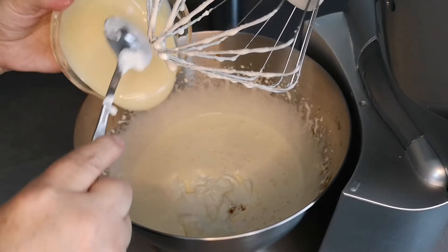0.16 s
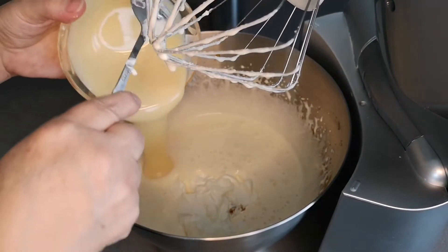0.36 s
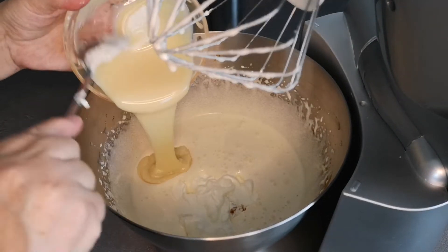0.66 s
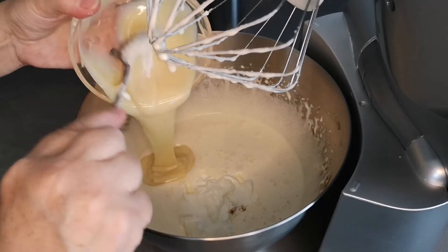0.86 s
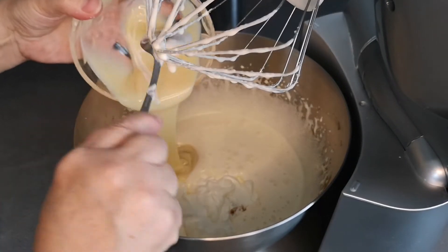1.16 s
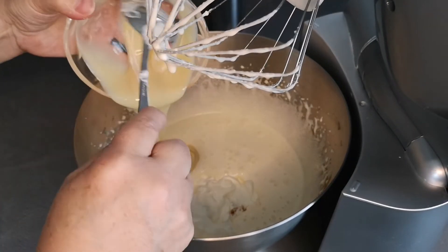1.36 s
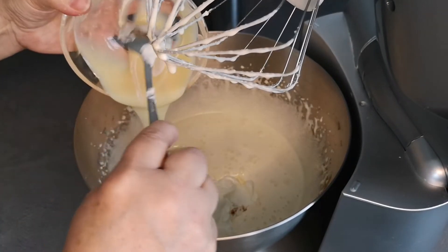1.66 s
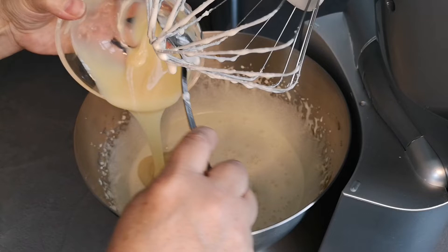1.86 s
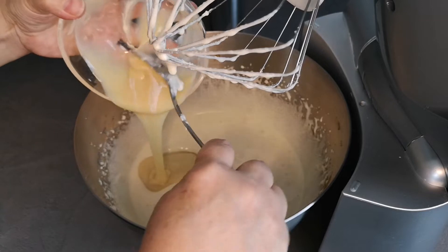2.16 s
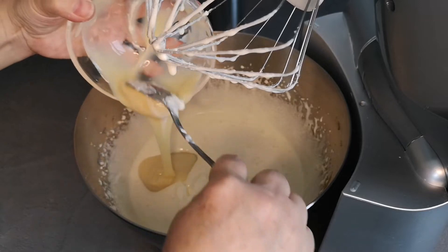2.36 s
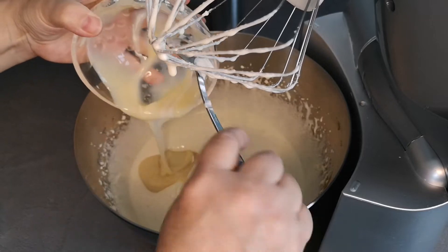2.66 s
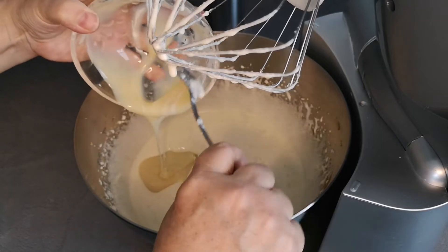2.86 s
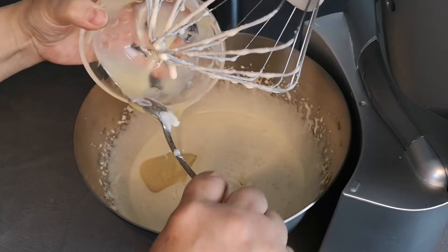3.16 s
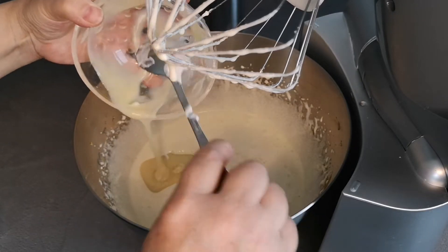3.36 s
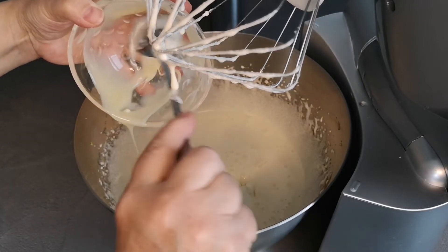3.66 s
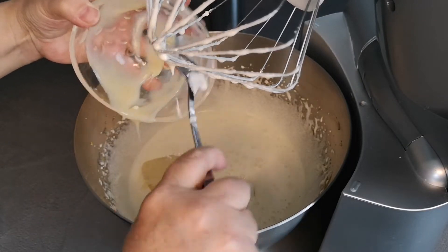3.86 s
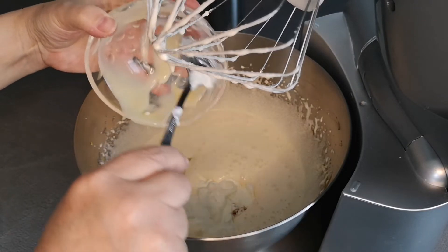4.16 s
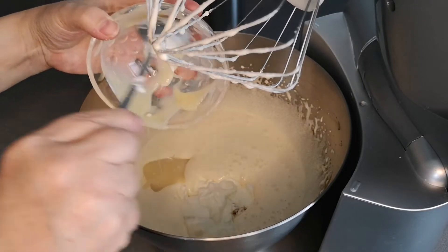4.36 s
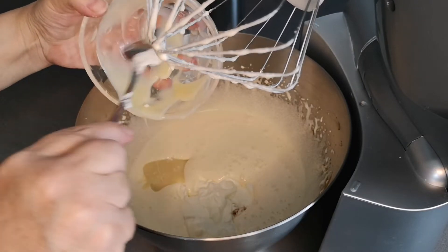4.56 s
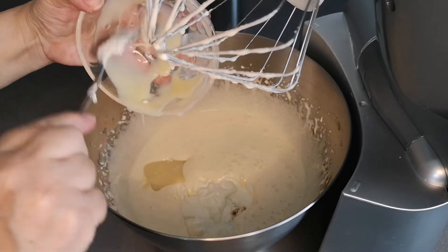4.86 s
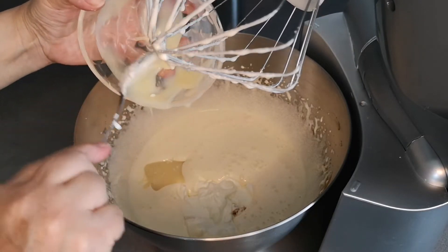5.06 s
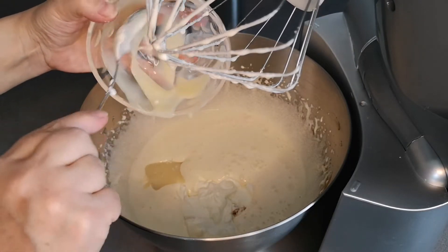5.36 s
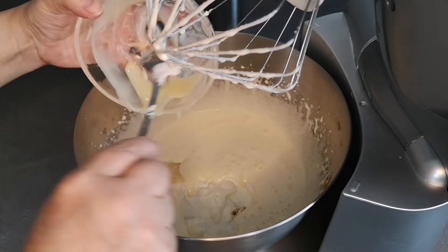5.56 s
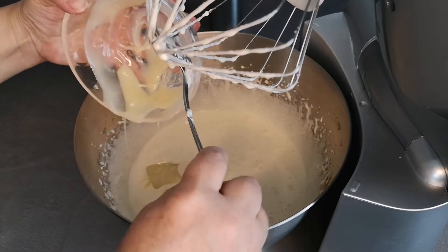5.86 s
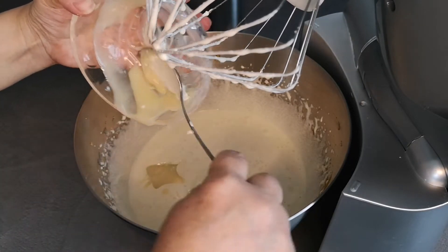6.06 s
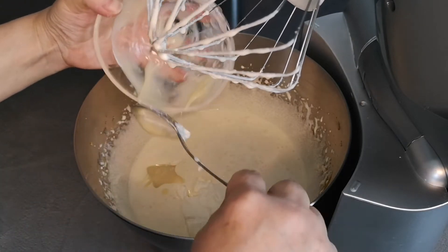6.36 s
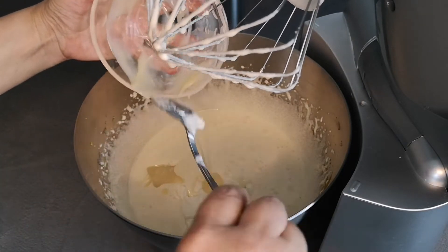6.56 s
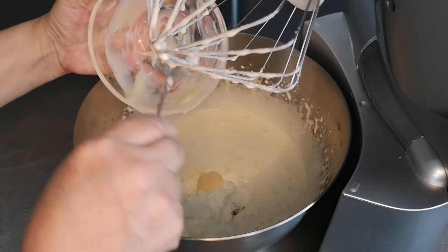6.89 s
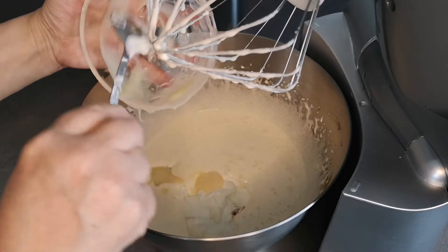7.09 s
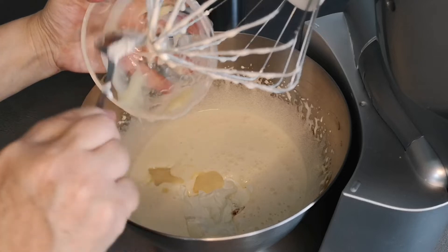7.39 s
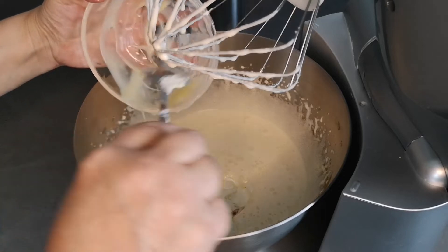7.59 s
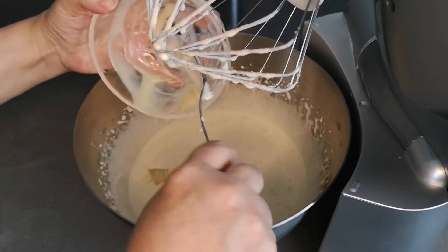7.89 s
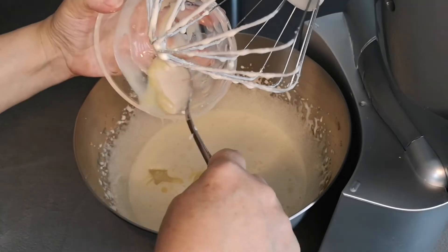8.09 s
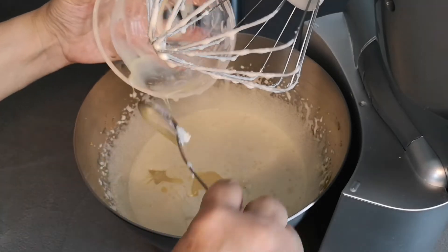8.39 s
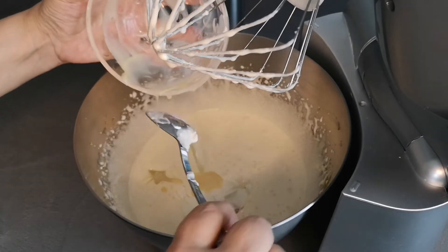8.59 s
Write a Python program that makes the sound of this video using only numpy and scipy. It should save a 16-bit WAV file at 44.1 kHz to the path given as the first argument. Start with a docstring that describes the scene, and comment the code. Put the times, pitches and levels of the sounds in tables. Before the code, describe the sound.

A metal fork clinks and scrapes inside a small hand-held glass bowl, scooping thick sweet mixture, over a faint low appliance hum in a ringing kitchen.

```python
"""A faint appliance hum and low rumble in a hard, ringing kitchen, then a fork clinks on glass.
The fork scoops a thick sweet mixture out of a small hand-held glass bowl. Each stroke is a burst of damped
modes, deadened by hand and syrup, then a drag: the clink convolved with tiny friction slips. Between them,
sweeps through the syrup are shaped friction noise. Twice the fork slips off the rim with a hollow chatter
of unsteady sines. Random echoes make the room; the microphone is hollow in its low midrange."""
import sys
import numpy as np
from scipy import signal
from scipy.fft import rfft, irfft, next_fast_len
from scipy.io import wavfile
from scipy.ndimage import map_coordinates

SR = 44100
rng = np.random.default_rng(int(sys.argv[2]) if len(sys.argv) > 2 else 0)


def file_out(sig):
    """Save sig as 16-bit WAV at sys.argv[1]."""
    # one column per channel
    cols = np.atleast_2d(sig).T
    # limit, then scale
    lim = np.clip(cols, -1, 1)
    pcm = np.round(lim * 32767).astype(np.int16)
    wavfile.write(sys.argv[1], SR, pcm)


N = 385196


def amp(db):
    """Decibels to gain."""
    return 10 ** (np.asarray(db) / 20)


def unit(x):
    """Scale to rms 1."""
    return x / np.sqrt(np.mean(x ** 2) + 1e-20)


def blow(x):
    """Scale a short sound to the energy of 12 ms at rms 1 in each channel."""
    return x / np.sqrt(np.sum(x ** 2, axis=-1, keepdims=True) / (.012 * SR) + 1e-20)


def tilt(left_minus_right_db):
    """Stereo gains, half the level difference on each side."""
    return amp([[left_minus_right_db / 2], [-left_minus_right_db / 2]])


def along(points, hz):
    """(Hz, value) points read on a log frequency axis."""
    f, v = np.transpose(points)
    return np.interp(np.log(hz + 1), np.log(f + 1), v)


def wobble(rate, size=N):
    """A smooth random curve, rate knots a second."""
    knots = rng.standard_normal(int(size * rate / SR) + 4)
    return map_coordinates(knots, [np.arange(size) * rate / SR])


def filtered(x, response):
    """x times a response of frequency, padded so that its tail does not wrap into the start."""
    n = x.shape[-1]
    m = next_fast_len(n + 4096)
    return irfft(rfft(x, m) * response(np.fft.rfftfreq(m, 1 / SR)), m)[..., :n]


def coloured(x, spectrum):
    """x shaped by (Hz, dB) points."""
    return filtered(x, lambda hz: amp(along(spectrum, hz)))


def add(track, s, sound):
    """Mix a stereo sound into the track at time s."""
    start = max(round(s * SR), 0)
    part = sound[:, :max(N - start, 0)]
    track[:, start:start + part.shape[1]] += part


# Still kitchen air. Each row: frequency in Hz, relative level in dB per Hz.
AIR_SPECTRUM = [(13, -40), (22, 1), (102, -12.5), (203, -20.5), (227, -19), (267, -21.5), (779, -30.5),
                (1870, -26.5), (4630, -35.5), (15500, -44.5)]
# How alike the air is in left and right. Each row: frequency in Hz, likeness from 0 to 1.
AIR_LIKENESS = [(60, 1), (140, .9), (400, 0.12), (1500, 0.1), (8000, 0.064)]
# Partials of the appliance hum, before the swell.
# Each row: frequency in Hz, level in dB at first, level in dB once the load has changed.
HUM_PARTIALS = [(59.6, -69, -70), (100.5, -70.5, -75), (83, -79, -76), (139.3, -83.5, -74),
                (193, -84, -84.5)]
# Hum and rumble rise once and ease off again, from a resting level.
LOW_REST_DB, SWELL_DB, SWELL_PEAK_S, SWELL_WIDTH_S = -0.8, 4.5, 6, 1.9


def background(air_db=-66, waver_db=3):
    """Noise as rumble and faint hiss, and wavering sines as an appliance whose load changes around 5 s."""
    # mid and side shares that give the wanted likeness between the channels
    angle = lambda hz: np.arccos(np.clip(along(AIR_LIKENESS, hz), -1, 1)) / 2
    mid_side = lambda hz: amp(along(AIR_SPECTRUM, hz)) * [np.cos(angle(hz)), np.sin(angle(hz))]
    mid, side = filtered(rng.standard_normal((2, N)), mid_side)
    air = unit(np.array([mid + side, mid - side]))
    rumble = filtered(air, lambda hz: 1 / (1 + (hz / 200) ** 4))
    hiss = air - rumble

    t = np.arange(N) / SR
    load = (1 + np.tanh((t - 5.0) / 0.94)) / 2
    hum = 0
    for hz, first_db, later_db in HUM_PARTIALS:
        level = amp(first_db + load * (later_db - first_db) + waver_db * wobble(9.8))
        hum = hum + level * np.sqrt(2) * np.sin(2 * np.pi * hz * t + 1.15 * wobble(11))

    # hum and rumble swell together; the hiss stays level
    swell_db = LOW_REST_DB + SWELL_DB * np.exp(-((t - SWELL_PEAK_S) / SWELL_WIDTH_S) ** 2)
    return amp(air_db) * hiss + amp(swell_db) * (amp(air_db) * rumble + hum)


# Decay of the hard room's tail. Each row: frequency in Hz, time in seconds to fall 60 dB.
ROOM_DECAY = [(200, 0.79), (1400, 0.62), (3500, 0.7), (9000, 0.51), (15000, 0.4)]


def in_kitchen(x, wet_db=-8.5, near_db=-11, near_t60=0.12, build=0.0046):
    """Direct sound, quick echoes from the mixer and worktop, and the room's tail, both of decaying noise."""
    hz, t, z = signal.stft(rng.standard_normal((2, SR * 3 // 4)), SR, nperseg=256)
    decay = amp(-60 * t / along(ROOM_DECAY, hz)[:, None])
    tail = signal.istft(z * decay, SR, nperseg=256)[1]
    t = np.arange(tail.shape[1]) / SR
    onset = 1 - np.exp(-(t / build) ** 2)
    near = rng.standard_normal(tail.shape) * amp(-60 * t / near_t60)
    echo = amp(wet_db) * unit(tail * onset) + amp(near_db) * unit(near * onset)
    echo = echo / np.sqrt(len(t))
    echo[:, 0] += 1  # the direct sound
    return signal.fftconvolve(x, echo, axes=1)


def ringing(t, hz, t60, attack=0.00066, lead=.00013, scatter=0.66):
    """One damped mode, reaching the left microphone lead seconds early, with its phase scattered by side."""
    phase = rng.uniform(0, 2 * np.pi) + scatter * rng.standard_normal((2, 1))
    arrival = t + np.array([[lead], [0]])
    return np.sin(2 * np.pi * hz * arrival + phase) * amp(-60 * t / t60) * (1 - np.exp(-t / attack))


def friction(size, spiky_db):
    """Tiny slips of metal on glass: noise whose strength jumps every 32 samples."""
    sizes = amp(spiky_db * rng.standard_normal(size // 32 + 1))
    return unit(rng.standard_normal(size) * np.repeat(sizes, 32)[:size])


# The bowl's hollow note when its rim is rubbed. Each row: frequency in Hz, relative level in dB.
RIM_NOTE = [(690, -18.5), (1160, -15), (1255, -1.5), (2015, -14.5), (2500, -20.5), (4800, -16), (9220, -20)]
# The fork is wiped over the rim: it catches, then slips off.
# Each row: time of the slip in seconds, time held before it in seconds, slip level in dB before the room.
WIPES_OVER_RIM = [(6.3071, .0085, -41.5), (8.289, .019, -32.5)]
RIM_CATCH_DB, RIM_CATCH_SHARE = -40, 0.21  # level of the catch; its swell as a share of the hold
RIM_SLIP_S = 0.0024  # swell of the slip
RIM_AFTER_S, RIM_AFTER_DB = 0.01, -7.5  # delay and swell of the softer judder; its level against the slip


def rim(roughness=0.63, flutter_db=3):
    """Wiped over the rim, the fork catches, slips and judders, bowing the bowl's low note in three spurts."""
    track = np.zeros((2, N))
    t = np.arange(-SR // 8, SR // 8) / SR
    spurt = lambda at, swell, db: amp(db) / np.cosh((t - at) / swell)
    for s, held, slip_db in WIPES_OVER_RIM:
        arrival = s + t + np.array([[.00004], [0]])  # left microphone first
        note = 0
        for hz, db in RIM_NOTE:
            level = amp(db + flutter_db * wobble(250.2, size=len(t)))
            unsteady_phase = roughness * wobble(179.9, size=len(t))
            note = note + level * np.sin(2 * np.pi * hz * arrival + unsteady_phase)
        catch = spurt(-held, RIM_CATCH_SHARE * held, RIM_CATCH_DB)
        slip = spurt(0, RIM_SLIP_S, slip_db)
        judder = spurt(RIM_AFTER_S, RIM_AFTER_S, slip_db + RIM_AFTER_DB)
        add(track, s + t[0], (catch + slip + judder) * unit(note))
    return in_kitchen(track * tilt(-5), wet_db=-15.5, near_db=-40)[:, :N]


# Fork through the syrup with no clink. Each row: time of the peak in seconds, swell in seconds,
# strongest resonance in Hz, level in dB, gritty hiss in dB against the glass murmur.
SYRUP_SWEEPS = [(.648, 0.0087, 1433, -61, 4.5), (.69, .018, 1470, -57.5, -8),
                (1.061, 0.007, 1470, -42.5, -7), (1.993, 0.013, 2170, -57, -5.5),
                (2.27, 0.038, 2160, -70.5, -9), (3.065, .015, 1074, -59.5, -3.5),
                (3.81, 0.016, 2390, -59.5, -1), (3.886, 0.03, 2320, -56.5, -4.5),
                (4.487, .02, 2315, -56, -5), (5.926, 0.019, 2500, -55, -2.5), (6.108, 0.017, 920, -63, 1)]
# The murmur of rubbed glass. Each row: frequency in Hz, relative level in dB.
MURMUR_SPECTRUM = [(150, -28.5), (320, -17.5), (540, -12.5), (900, -5.5), (1300, 5.5), (1850, -5.5),
                   (2400, 2.5), (3000, -2.5), (4000, -7), (6000, -30.5)]
# The gritty hiss, heard in the drags too. Each row: frequency in Hz, relative level in dB.
GRIT_SPECTRUM = [(2500, -42.5), (4200, -3.5), (5500, 5), (7500, -0.5), (9300, 1.5), (10500, -17),
                 (15000, -28)]
# every drag ends in a sweep as the fork lifts: level against the drag, swell, hiss against the murmur
LIFT_DB, LIFT_SWELL_S, LIFT_GRIT_DB = -5.5, 0.023, -6.5
# the sweep under each rim wipe, and a short scratch as the tines slip off; hiss against the murmur
RIM_RUB_DB, RIM_RUB_S, RIM_SCRATCH_DB, RIM_GRIT_DB = -50, 0.018, -45, -1.5
LOW_GLASS_HZ = 1344  # the favoured low resonance of the glass


def sweeps(resonance_db=0, resonance_t60=0.012, catch_db=3.0):
    """Friction in the syrup, freely, at a drag's end or over the rim: glass murmurs with a gritty hiss."""
    track = np.zeros((2, N))
    t = np.arange(-SR // 4, SR // 4) / SR
    lifts = [(s + length, LIFT_SWELL_S, ring_hz, drag_db + LIFT_DB, LIFT_GRIT_DB)
             for s, *_, ring_hz, _, drag_db, length in FORK_STROKES]
    wipes = [(s - held / 2, RIM_RUB_S, LOW_GLASS_HZ, RIM_RUB_DB, RIM_GRIT_DB)
             for s, held, _ in WIPES_OVER_RIM]
    scratches = [(s, RIM_SLIP_S, LOW_GLASS_HZ, RIM_SCRATCH_DB, RIM_GRIT_DB)
                 for s, _, _ in WIPES_OVER_RIM]
    for s, swell, hz, db, grit_db in SYRUP_SWEEPS + lifts + wipes + scratches:
        slips = np.array([friction(len(t), spiky_db=4.5) for _ in range(2)])
        slips = slips * amp(catch_db * wobble(160, size=len(t)))
        mode = ringing(t - t[0], hz, resonance_t60)
        resonance = signal.fftconvolve(slips, mode, axes=1)[:, :len(t)]
        murmur = unit(unit(coloured(slips, MURMUR_SPECTRUM)) + amp(resonance_db) * unit(resonance))
        grit = amp(grit_db) * unit(coloured(slips, GRIT_SPECTRUM))
        sound = amp(db) * (murmur + grit)
        add(track, s + t[0], in_kitchen(sound / np.cosh(t / swell)))
    return track


HIGH_GLASS_DB = 2.5  # the middle register stands out by this much
TINES_HZ, TINES_OCTAVES_PER_DB, TINES_TOP_HZ = 5430, 0.4, 9000  # brighter contact, higher tines, to a limit


def registers_of(db, bright_db, spacing_hz, glass_hz):
    """(Hz, dB) of low glass, high glass and tines; brightness tilts them about the middle one."""
    tines_hz = min(TINES_HZ * 2 ** (TINES_OCTAVES_PER_DB * max(bright_db, 0)), TINES_TOP_HZ)
    tines_hz = spacing_hz * np.round(tines_hz / spacing_hz)  # the nearest peak of the wall's echo
    return [(LOW_GLASS_HZ, db - bright_db), (glass_hz, db + HIGH_GLASS_DB), (tines_hz, db + bright_db)]


# Modes of the held bowl and the fork, shifted a little at each stroke.
# Each row: frequency in Hz, relative level in dB, time in seconds to fall 60 dB.
BOWL_AND_FORK_MODES = [(840, -3.5, 0.024), (1140, -5, 0.025), (1282, 2, 0.024), (1401, 1, 0.031),
                       (1603, 0.5, .022), (2238, 0.5, 0.025), (2913, 3, 0.018), (3146, -4.5, 0.021),
                       (3470, 3, 0.023), (3936, -6, .018), (3994, -12.5, 0.0083), (5185, 3, 0.023),
                       (5590, 6, 0.018), (5900, -6, 0.014), (6656, 1, 0.014), (7230, -2, 0.019),
                       (8320, -5, 0.022), (9040, -3.5, 0.017), (10340, -16, .014), (13300, -18.5, .01)]
# The rattle of tines on glass. Each row: frequency in Hz, relative level in dB.
RATTLE_SPECTRUM = [(300, -25), (600, -25), (900, 1.5), (1400, 0.5), (4000, 0.5), (9200, 2), (10300, -10.5),
                   (14000, -24.5), (16000, -26)]
# The strongest resonance against the rattle. The row: low glass in dB, high glass in dB, tines in dB.
FAVOURED_DB = [-1, -1, -7.5]
RING_T60 = 0.024  # the contact ring's decay (s)


def clink(spacing_hz, ring_hz, ring_db, knock_db, registers, crack_db=0, contact=0.0039,
          favoured_t60=0.013, ring_pan_db=5, echo_db=-6):
    """The tines rattle on the glass for a few ms; the contact point decides which resonances speak."""
    t = np.arange(SR // 16) / SR
    modes = 0
    for hz, db, t60 in BOWL_AND_FORK_MODES:
        # grip and contact point shift every mode a little from stroke to stroke
        level = amp(db + rng.normal(0, 1.5))
        modes = modes + level * ringing(t, hz * rng.normal(1, .015), t60)
    rattle = rng.standard_normal((2, len(t))) * (1 - np.exp(-t / 0.00033)) * np.exp(-(t / contact) ** 2)
    struck = blow(modes) + amp(crack_db) * blow(coloured(rattle, RATTLE_SPECTRUM))
    # an echo from the bowl's wall, about a millisecond later, combs the sound into evenly spaced peaks
    struck = filtered(struck, lambda hz: 1 + amp(echo_db) * np.exp(-2j * np.pi * hz / spacing_hz))

    # fork and wall pressed together ring briefly at a pitch that depends on where they touch
    ring = amp(ring_db) * tilt(ring_pan_db) * blow(ringing(t, ring_hz, RING_T60))
    # the whole bowl recoils in the hand with a dull knock
    recoil = ringing(t, hz=308.6, t60=0.039) + 0.72 * ringing(t, hz=423, t60=0.02)
    sound = ring + amp(knock_db) * blow(recoil)

    bands = [(180, 1750), (1900, 4500), (4700, 16000)]  # low glass, high glass, tines (Hz)
    for (hz, db), share_db, band in zip(registers, FAVOURED_DB, bands):
        band_filter = signal.butter(4, band, "band", fs=SR, output="sos")
        register = blow(signal.sosfilt(band_filter, struck))
        favoured = amp(share_db) * blow(ringing(t, hz, favoured_t60))
        sound = sound + amp(db) * blow(register + favoured)
    return sound


# The fork lands on the glass and drags on; the contact point sets the pitches. Levels are before stereo
# placing and room. Each row: start in seconds, level in dB, brightness in dB per register,
# spacing of the echo's peaks in Hz, high glass in Hz, contact ring in Hz, contact ring level in dB,
# drag level in dB, drag length in seconds.
FORK_STROKES = [(0.2922, -43.5, 4.5, 773, 3920, 1580, -41, -67, .055),
                (0.9395, -39, -1.5, 1024, 3010, 1950, -39, -54.5, 0.15),
                (1.3869, -36.5, -3.5, 1052, 3150, 2020, -32, -48, .15),
                (1.751, -36.5, -2.5, 719, 3560, 2207, -32.5, -49.5, .115),
                (2.5408, -46, 4.5, 1315, 4400, 1880, -48.5, -64, .076),
                (2.6371, -42.5, -4.5, 1300, 3770, 2336, -34.5, -53.5, .16),
                (3.495, -47, -6, 1174, 3500, 2355, -39, -63, 0.14),
                (3.678, -56, 0, 1175, 2900, 2350, -62, -60, 0.068),
                (3.718, -67, -10, 1300, 2850, 1275, -57, -77, .04),
                (4.218, -37.5, 1, 761, 3760, 2316, -34.5, -53, .093),
                (4.653, -33, 1, 742, 3560, 2280, -37, -49, 0.16),
                (5.3257, -32.5, -1, 1284, 3890, 2444, -20.5, -42, .18),
                (5.829, -58, -7.5, 1333, 2990, 1300, -53, -67, .08),
                (5.9273, -49.5, 0, 1140, 2980, 985, -48, -74, .037),
                (6.9074, -37, 3, 1223, 2820, 2464, -28, -43.5, .16),
                (6.911, -38, 4, 1186, 2770, 2790, -34.5, -47, .16),
                (7.2068, -32.5, 1.5, 744, 3680, 1460, -37, -46, .165),
                (7.652, -39, 6, 1335, 2670, 1945, -39.5, -42, .085),
                (7.763, -31, -2.5, 1358, 2650, 2450, -31, -51, 0.12)]
KNOCK_DB, KNOCK_DB_PER_S = -14.5, -.5  # recoil against the clink; it weakens as the bowl empties
KNOCK_DULL_SHARE = 0.44  # a duller contact knocks harder, in dB per dB of brightness
BOWL_PAN_DB = -2  # left minus right, applied to the whole clink


def strokes(graze_db=-27, graze_lead=.0025, catch_db=2, rasp_db=-11):
    """A grazing touch, the clink, then friction slips that keep the clink's resonances sounding."""
    track = np.zeros((2, N))
    t = np.arange(SR // 2) / SR
    for s, db, bright_db, spacing_hz, glass_hz, ring_hz, ring_db, drag_db, length in FORK_STROKES:
        knock_db = db + KNOCK_DB + KNOCK_DB_PER_S * s - KNOCK_DULL_SHARE * bright_db
        registers = registers_of(db, bright_db, spacing_hz, glass_hz)
        hit = clink(spacing_hz, ring_hz, ring_db, knock_db, registers) * tilt(BOWL_PAN_DB)

        slips = np.array([friction(len(t), spiky_db=4.0) for _ in range(2)])
        # the tines catch and let go unevenly along the wall
        uneven_slips = slips * amp(catch_db * wobble(90, size=len(t)))
        rub = unit(signal.fftconvolve(hit, uneven_slips, axes=1)[:, :len(t)])
        # a gritty rasp rides on the drag, more so for a bright contact
        rub = unit(rub + amp(rasp_db + bright_db) * unit(coloured(slips, GRIT_SPECTRUM)))
        pressure = (1 - np.exp(-t / .03)) * np.exp(-(t / length) ** 4)

        stroke = amp(drag_db) * pressure * rub
        stroke[:, :hit.shape[1]] += hit
        add(track, s, in_kitchen(stroke))
        add(track, s - graze_lead, amp(graze_db) * hit)
    return track


def scene():
    """Fork strokes, sweeps and rim wipes over the quiet kitchen."""
    return strokes() + sweeps() + rim() + background()


DIP_HZ, DIP_OCTAVES, DIP_DB = 589, 0.2, -5  # the hollow in the microphone's colour
TOP_HZ = 15800  # the microphone's band limit


def record(dry):
    """The microphone has a hollow in its low midrange and keeps nothing above its band limit."""
    colour = lambda hz: amp(DIP_DB * np.exp(-(np.log2((hz + 1) / DIP_HZ) / DIP_OCTAVES) ** 2))
    return filtered(dry, lambda hz: colour(hz) * (hz < TOP_HZ))


dry = scene()
out = record(dry)
file_out(out)
```